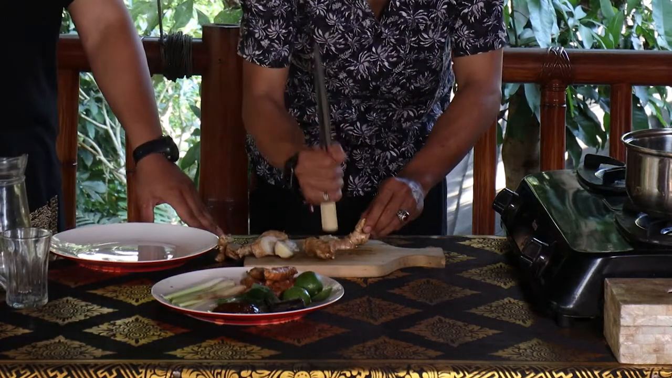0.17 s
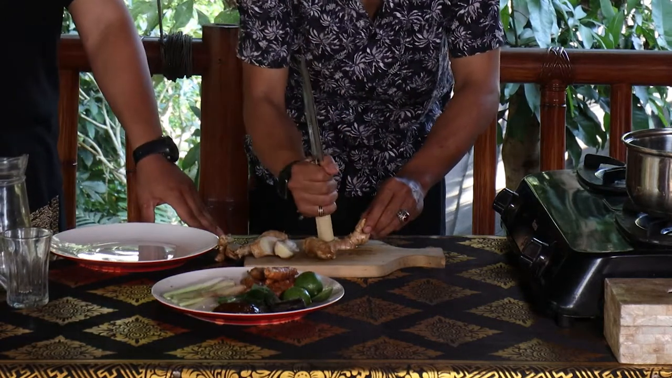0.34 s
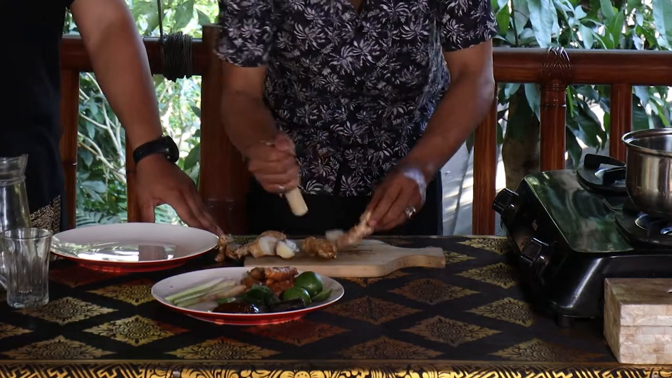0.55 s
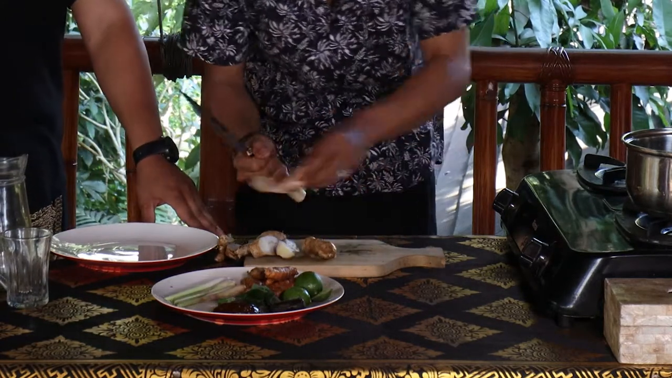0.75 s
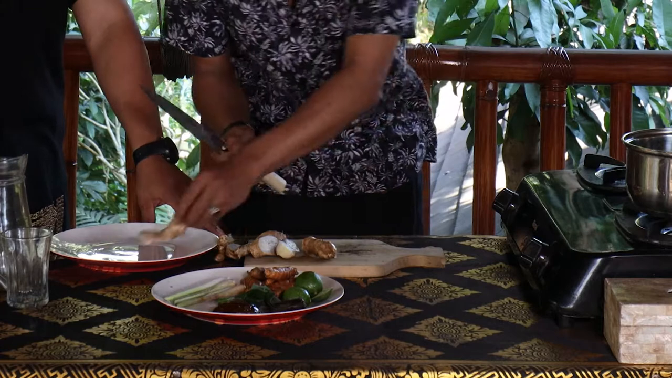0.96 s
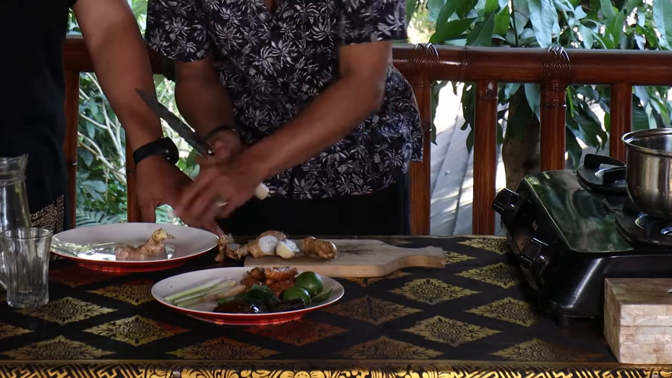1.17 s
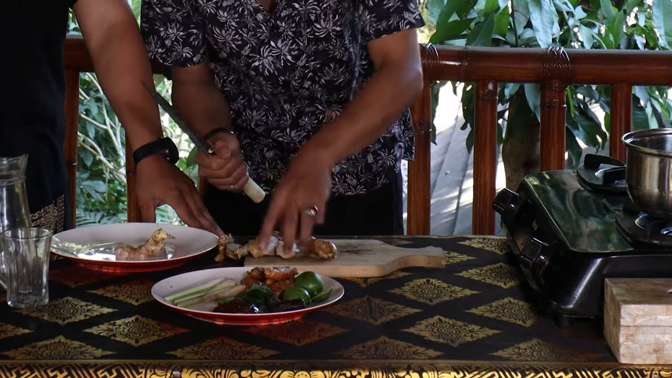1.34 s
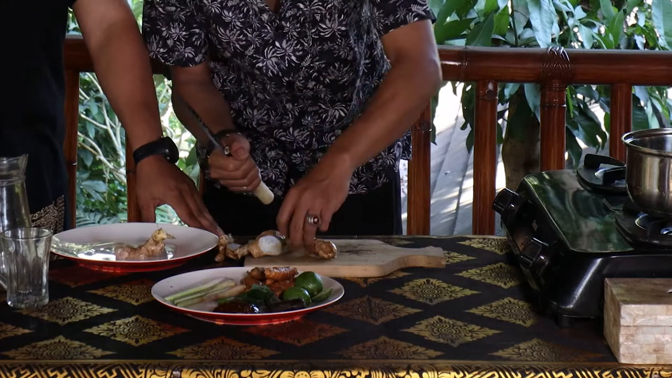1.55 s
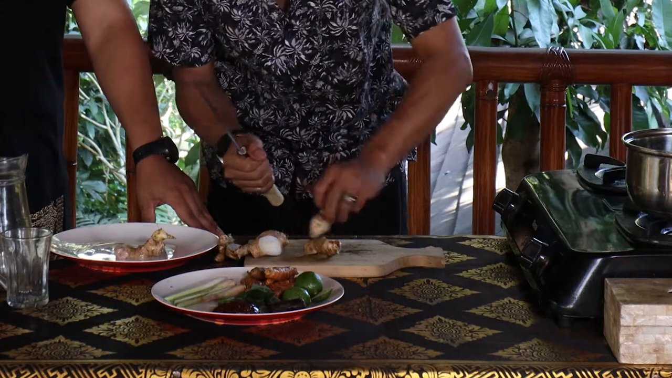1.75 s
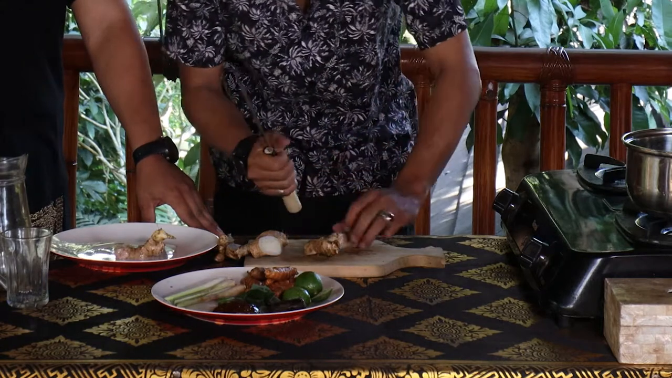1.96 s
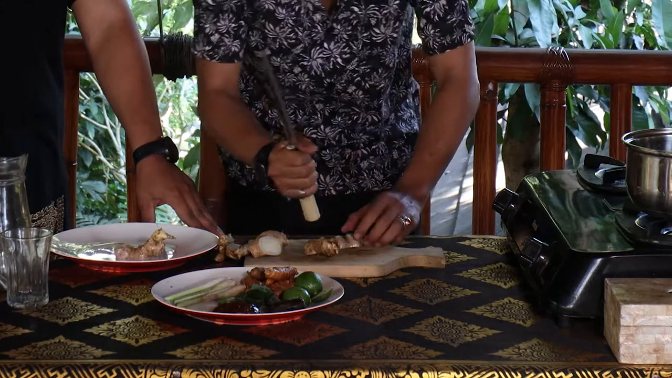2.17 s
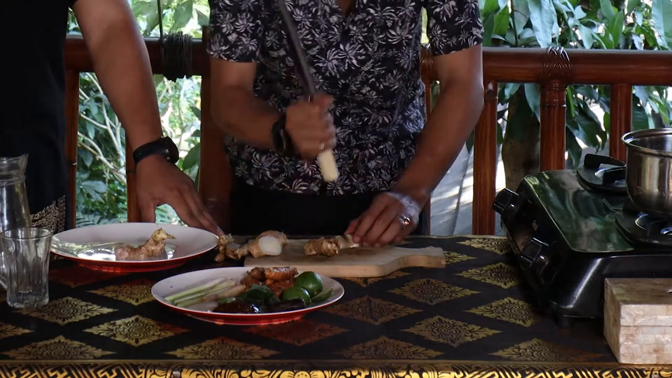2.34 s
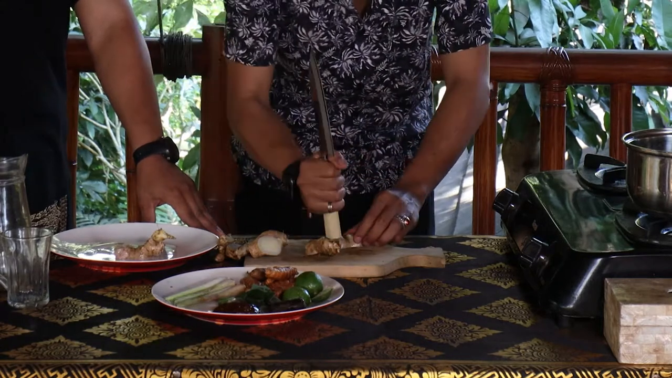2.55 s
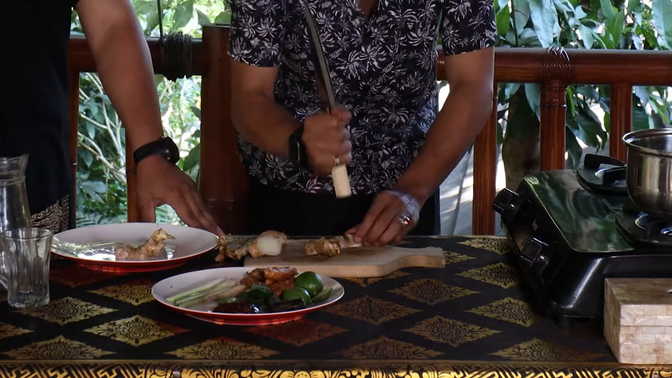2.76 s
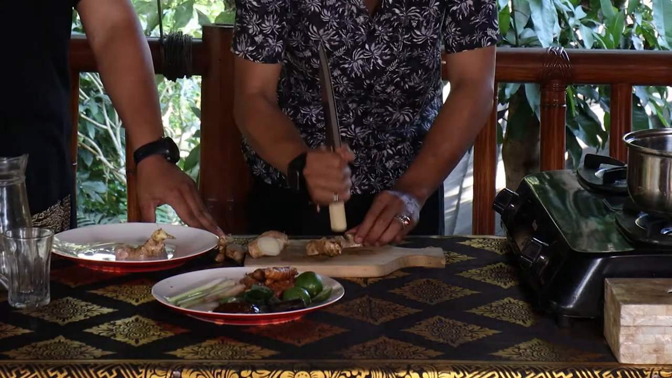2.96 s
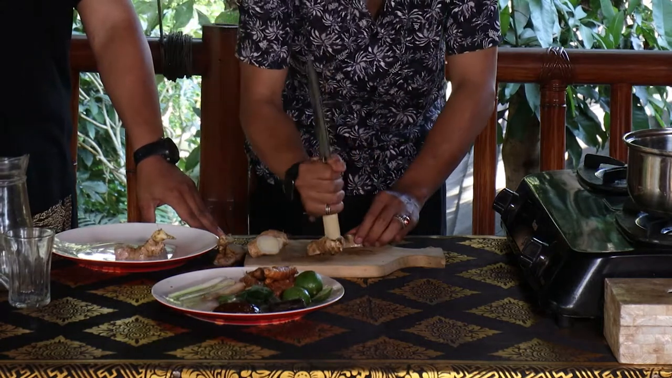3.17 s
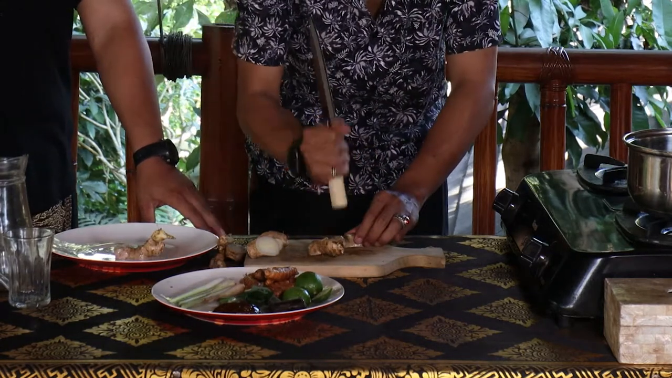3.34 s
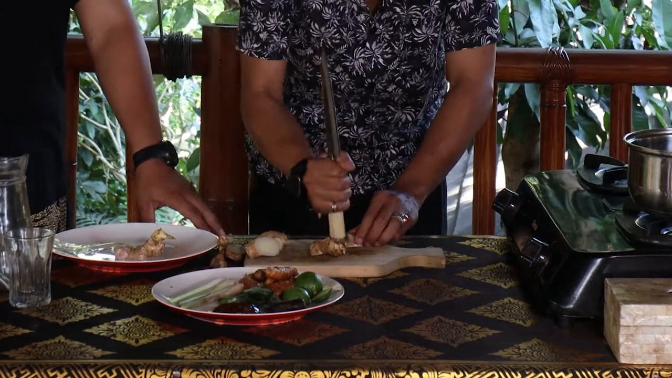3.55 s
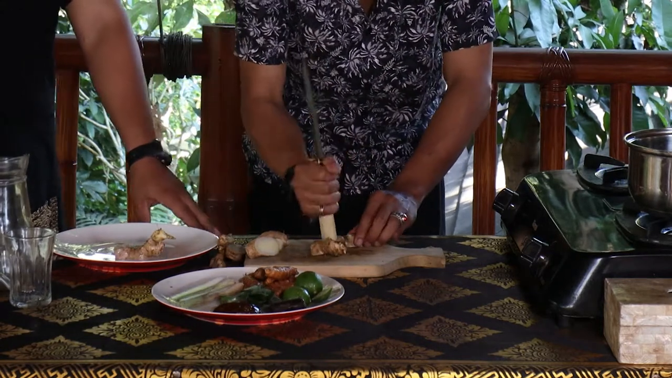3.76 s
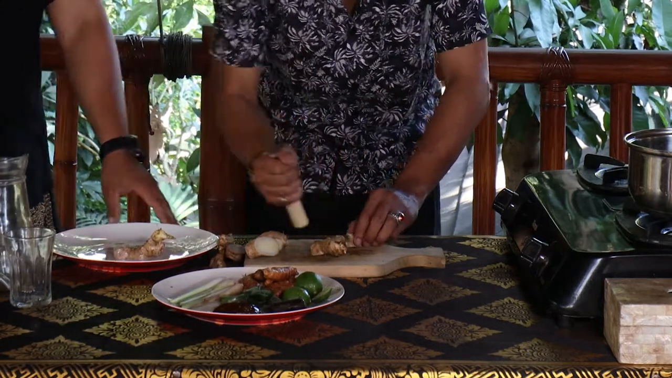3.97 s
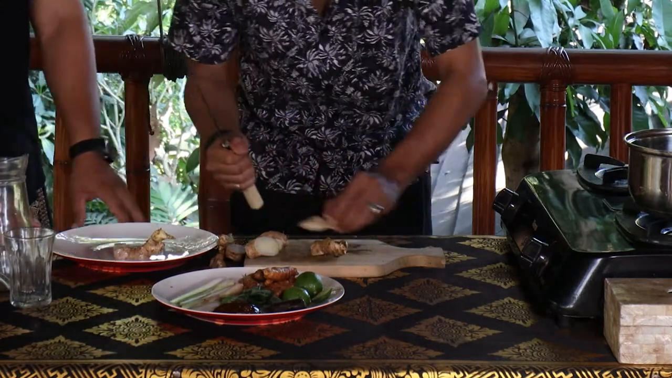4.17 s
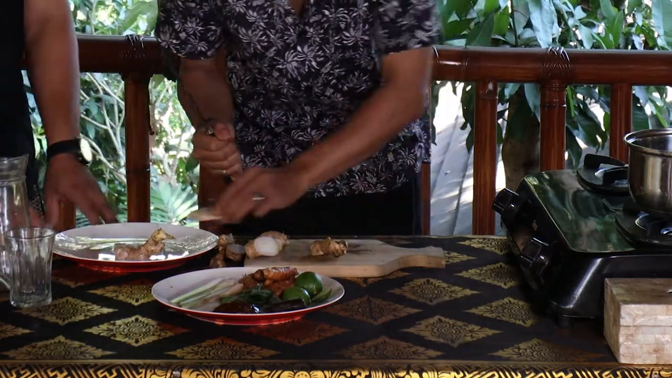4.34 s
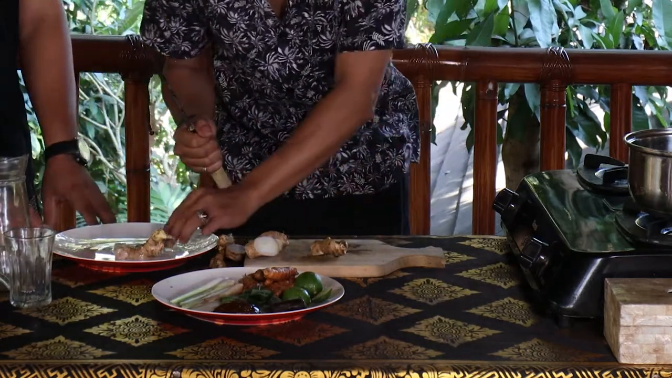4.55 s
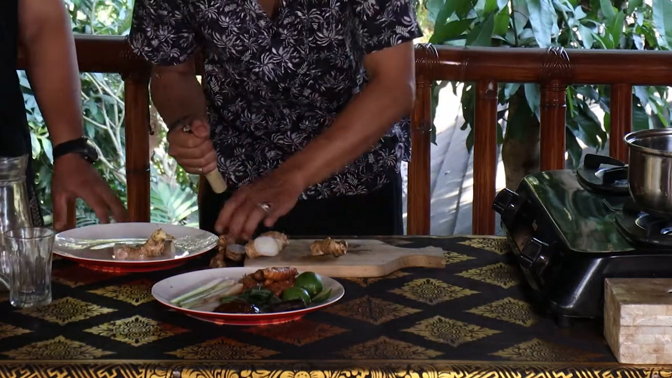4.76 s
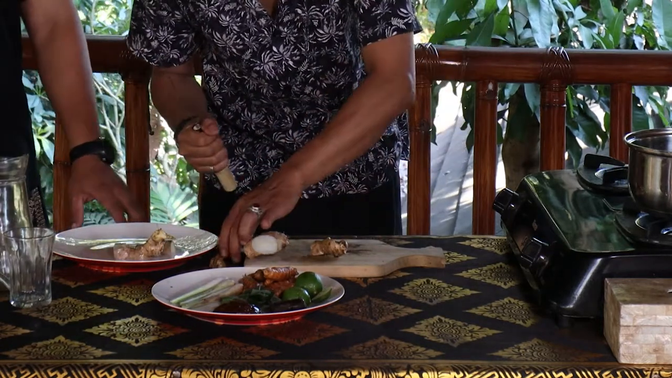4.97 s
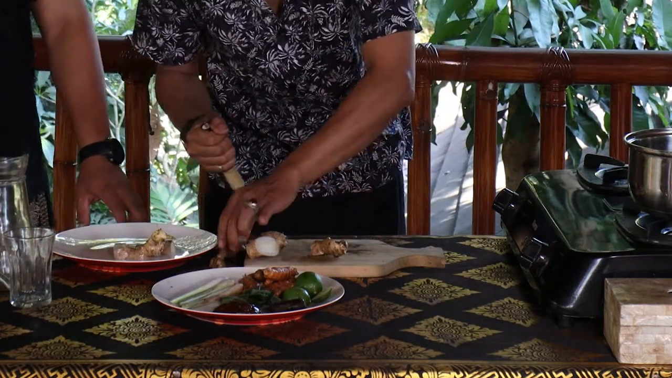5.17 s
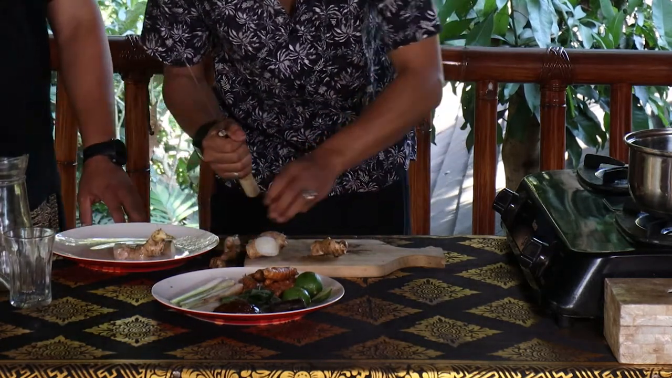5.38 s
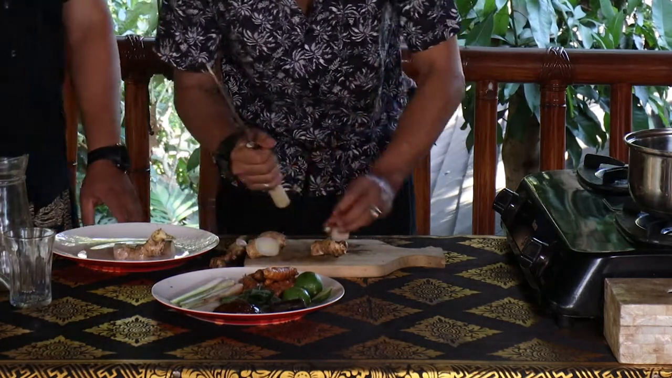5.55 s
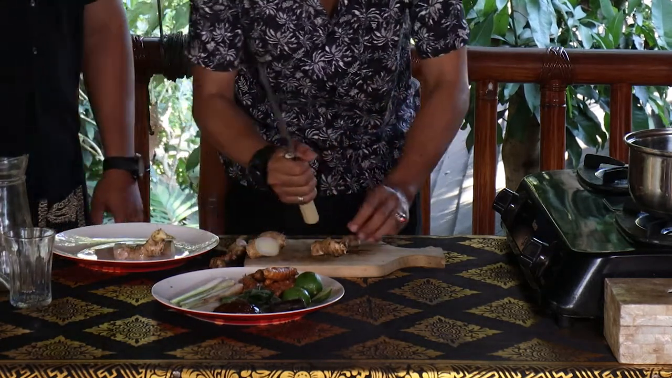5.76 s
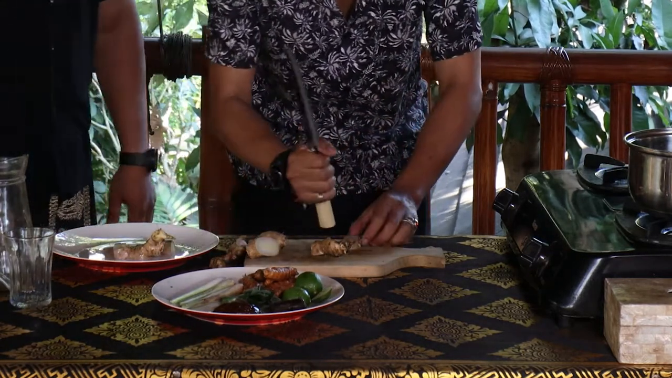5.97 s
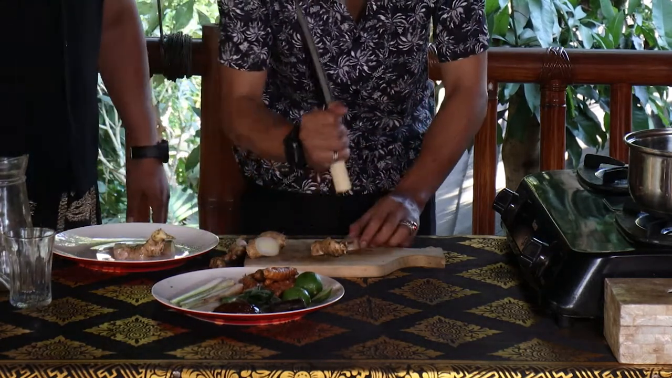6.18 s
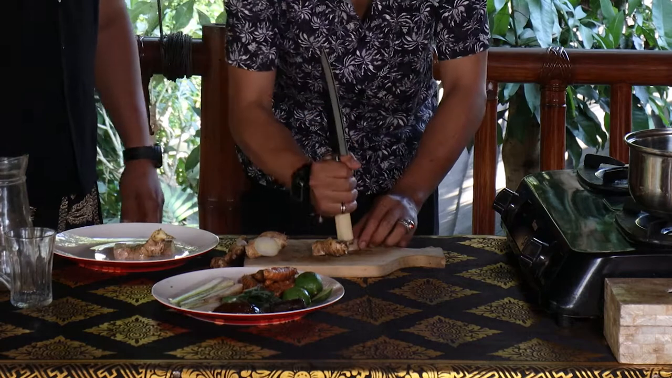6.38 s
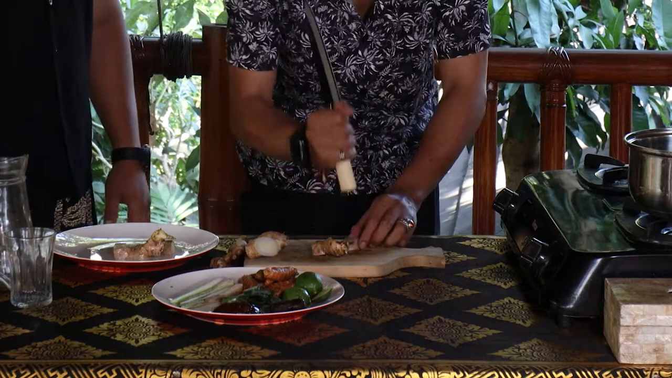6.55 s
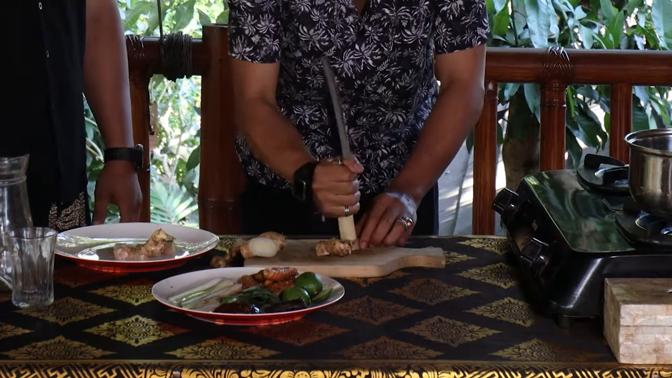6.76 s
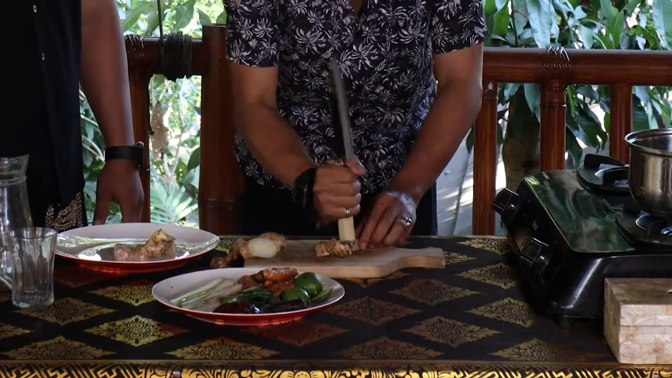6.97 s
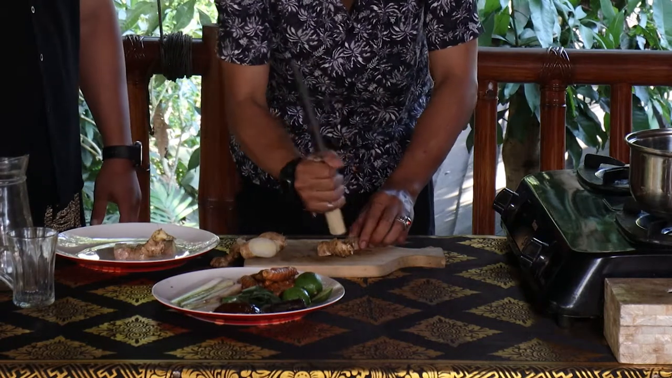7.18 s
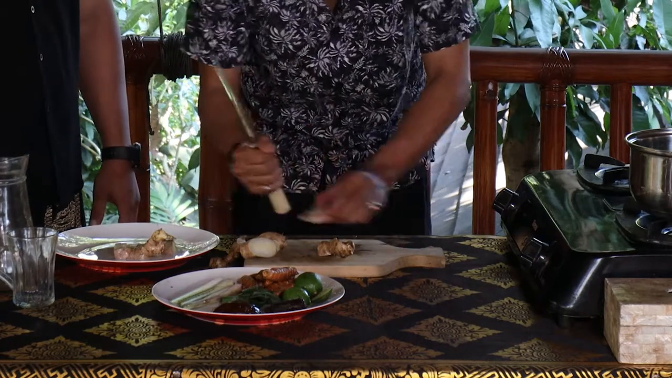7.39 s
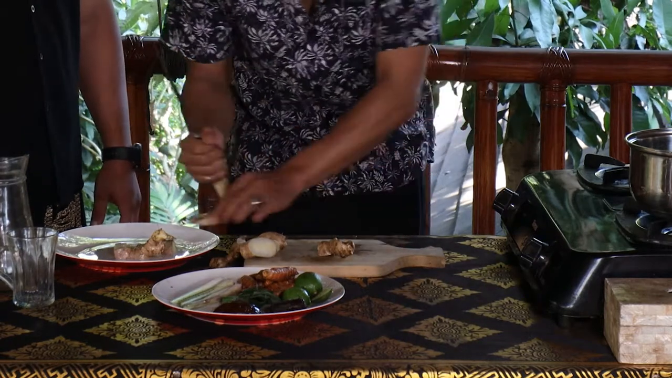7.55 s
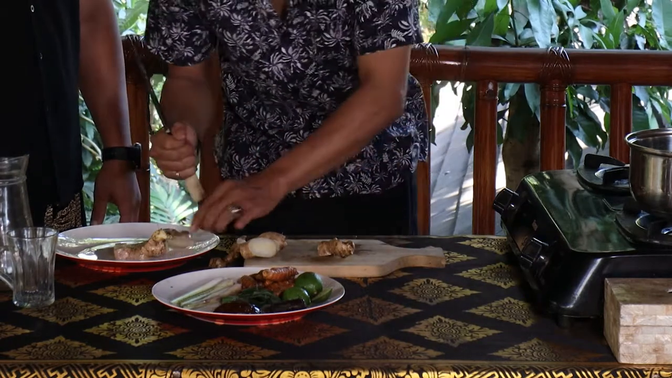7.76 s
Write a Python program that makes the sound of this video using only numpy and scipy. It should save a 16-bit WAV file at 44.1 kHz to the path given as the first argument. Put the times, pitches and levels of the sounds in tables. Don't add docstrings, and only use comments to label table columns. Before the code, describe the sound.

Ginger is smashed on a board with sharp woody whacks and clattering rebounds, between soft handling sounds, on a quiet garden veranda.

```python
import sys
import numpy as np
from scipy import signal
from scipy.io import wavfile

SR = 44100
rng = np.random.default_rng(int(sys.argv[2]) if len(sys.argv) > 2 else 0)


def ratio(d):
    e = np.asarray(d, float) / 20
    return 10 ** e


def materialize(psi):
    bounded = np.clip(np.atleast_2d(psi).T, -1, 1)
    quanta = np.round(bounded * 32767).astype(np.int16)
    wavfile.write(sys.argv[1], SR, quanta)


N = 344862
TIME = np.arange(N) / SR

# start in seconds, thump level in dB, crack level in dB, plate ring in dB, glass ring in dB.
BLOWS = [
    (.082, -5, -14, -47, -50),
    (0.3645, -4, -24, -52, -47.5),
    (2.555, -6.5, -18, -45.5, -40.5),
    (2.896, -5, -16.5, -43, -42),
    (3.213, -4, -19.5, -42.5, -44.5),
    (3.5178, -3.5, -18, -38.5, -51),
    (3.8018, -4.5, -32.5, -45.5, -56),
    (6.3666, -7, -26.5, -48.5, -55),
    (6.7228, -4.5, -21, -30.5, -42),
    (7.0453, -4, -23, -34.5, -44.5),
]
# far-edge knock in dB, slap delay in seconds, slap in dB,
# landing delay in seconds, landing in dB.
REBOUNDS = [(-5.5, .0201, -8, .0534, -6), (-6.5, .0187, -6.8, .051, -8), (-7.5, 0.019, -3.5, 0.051, -6),
            (-11, 0.017, -3.5, .0515, -6.5), (-11, 0.022, -4.5, 0.044, -4), (-6, 0.013, -4.5, 0.047, -3),
            (-3.5, 0.012, -9.5, .0577, -14.5), (-11.5, .0204, -5.5, .0499, -10.5),
            (-3, 0.023, -6, .0541, -1.5), (-5, .0165, -5.5, .056, -3.5)]
# pitch in Hz,
# upper board mode in dB and table mode in dB, both relative to the contact.
VOICES = [(649, -6, -22), (690, 0, -16), (576, -4, -6), (610, -9, -6.5)]
# delay in seconds, level in dB relative to the thump.
CHATTER = [(.030, -13), (.0415, -10)]
# seconds from the landing, level in dB relative to it.
LANDING_TOUCHES = [
    (-.0065, -12),
    (.006, -7),
    (.0135, -14),
]
KNOCK_S = 0.012
SCATTER_DB, SCATTER_S, PITCH_SCATTER = 1, 0.001404, 0.12

# pitch in Hz, level in dB, cycles until it has died.
THUMP = [(329.5, 3, 3.7), (246, -13, 7.6), (484, -13.5, 21), (116, -21, 5.9)]
# pitch in Hz, level in dB, time to fall 60 dB in seconds.
CRACK = [(1594, 4.5, 0.012), (2550, -5, 0.012), (3080, 6, 0.0075), (4490, -2, 0.0064), (5260, 2, 0.0041),
         (6960, 0, 0.0043), (8950, -16, 0.011)]
# pitch in Hz, level in dB, time to fall 60 dB in seconds.
PLATE = [(581, -3, .47), (1212, 0, .87), (2460, -18, .43)]
# pitch in Hz, level in dB, time to fall 60 dB in seconds.
GLASS = [(5196, 0, .55), (5706, -6.5, .5), (6853, -16, .6), (8398, -19, .5)]
BARE_CRACK_DB, DULLING_PER_DB = -16.5, 1.77

# frequency in Hz, level in dB per Hz.
CLATTER = [(18, -43.5), (30, -26), (81, -14), (200, -8), (337, -2), (460, -4), (1480, -17), (2700, -30.5),
           (5300, -37.5), (9890, -46), (11900, -47.5), (13500, -51), (15000, -80)]
# frequency in Hz, time to fall 60 dB in seconds.
CLATTER_T60 = [(40, 0.22), (150, 0.22), (500, 0.22), (1500, 0.2), (5000, 0.13), (12000, 0.055)]

# start in seconds, peak in dB, pitch in Hz, board in dB, table thud in dB.
SET_DOWNS = [(1.193, -40.5, 1447, -56, -35), (1.209, -40, 1060, -41, -43), (1.918, -44, 907, -39, -49),
             (2.073, -54, 945, -42, -52), (2.103, -34, 1040, -47, -37.5), (3.096, -35, 740, -27, -36),
             (3.136, -49, 700, -34, -37), (4.59, -50, 936, -61, -48), (4.665, -44, 2360, -44, -38.5),
             (4.691, -43.5, 815, -54, -43), (5.212, -63, 1070, -35, -35.5), (5.252, -50, 947, -60, -43.5),
             (5.553, -47, 1000, -59, -48), (5.636, -49, 790, -31.5, -32.5), (5.863, -33, 1375, -32, -40.5),
             (7.765, -49, 810, -52, -39.5)]
# start in seconds, peak in dB, pitch in Hz.
TOUCHES = [(0.853, -44, 1790), (1.016, -43.5, 914), (1.099, -41.5, 1400), (1.286, -45, 1330),
           (1.342, -45.5, 990), (1.437, -44, 910), (1.665, -38.5, 880), (1.689, -38.5, 1750),
           (2.296, -41, 847), (4.181, -45.5, 786), (4.627, -44.5, 780), (4.718, -47, 1000),
           (4.895, -42.5, 1580), (5.011, -42.5, 1540), (5.084, -39, 2630), (5.328, -39.5, 1930),
           (5.414, -38, 2520), (6.016, -40, 1680), (6.099, -45, 2190), (7.493, -44, 920)]
TOUCH_BOARD_DB, TOUCH_THUD_DB = -19.5, -24.5
# start in seconds, peak in dB, pitch in Hz.
TICKS = [(0.8131, -48, 6000), (1.2146, -44, 6120), (1.5614, -53, 9340), (1.6018, -42, 9500),
         (1.8647, -46, 9800), (2.0667, -43, 10950), (2.163, -41, 11300), (2.2426, -42, 10400),
         (2.4648, -43, 11700), (4.568, -41, 10000), (4.8943, -45, 6290), (5.3284, -53, 6400),
         (5.9324, -50, 6280), (6.2355, -37, 10700), (6.3365, -35.5, 7400), (6.6787, -34, 8900),
         (7.0124, -32, 8250), (7.3393, -36.5, 11200), (7.633, -41, 6430)]
# start in seconds,
# level in dB, pitch in Hz, time to fall 60 dB in seconds.
CLINKS = [(0, -59, 7000, .6), (2.22, -45, 810, .25), (2.393, -33, 3160, .02), (2.69, -49.5, 2460, .3),
          (2.81, -52, 3400, .1), (4.5, -52, 2500, .1), (4.666, -34.5, 3590, .067), (4.666, -41, 2390, .087),
          (4.666, -49, 5900, .06), (4.666, -42, 420, .091), (6.012, -54, 3150, .25),
          (6.376, -38, 8000, .03), (6.655, -48, 2900, .05), (6.679, -45, 3650, .03),
          (7.072, -36, 5000, .04), (7.235, -55, 2350, .13)]
# time in seconds, level in dB.
SLIDE = [(5.45, -90), (5.55, -62), (5.75, -54.5), (5.95, -61), (6.1, -61), (6.2, -87)]

# frequency in Hz, level in dB per Hz.
WATER = [(15, -43), (25, -7.5), (145, -3), (363, -6.5), (439, -1.5), (545, -0.5), (1330, -1.5),
         (1840, -1.5), (2910, -8), (3250, -9.5), (3820, -13.5), (5430, -18), (11300, -17), (12900, 3),
         (16000, -40)]
# frequency in Hz, likeness from 0 to 1.
LIKENESS = [(60, 0.83), (180, 0.66), (550, 0.78), (1650, 0.95), (4970, 0.72), (15000, 0.26)]
WATER_DB, WATER_SWAY_DB = -52, 0.54
CRICKET_DB, CRICKET_BEAD_DB, CRICKET_BEADS_PER_S = -65, 9, 9.0
CICADA_PERIOD_S, CICADA_TOP_S, CICADA_ONSET, CICADA_STEEPNESS = 2.28, .44, .45, 3.5
CICADA_LOW_HZ, CICADA_RISE_HZ, CICADA_LOW_DB, CICADA_SWELL_DB = 13150, 600, -75.5, 5.5


def rms_one(x):
    return x / np.sqrt(np.mean(x ** 2) + 1e-20)


def at_hz(points, hz):
    table_hz, values = np.transpose(points)
    return np.interp(np.log(hz), np.log(table_hz), values)


def drift(rate):
    r = np.exp(-40 * np.pi * rate / SR)
    slow = signal.lfilter([1], [1, -2 * r, r * r], rng.standard_normal(N // 20 + 4002))[4000:]
    return np.interp(np.arange(N) / 20, np.arange(len(slow)), rms_one(slow))


def ring(pushes, hz, t60):
    r, w = ratio(-60 / (t60 * SR)), 2 * np.pi * hz / SR
    return signal.lfilter([0, np.sin(w)], [1, -2 * r * np.cos(w), r * r], pushes + 1e-18)


def clicks(times, level_db):
    out = np.zeros(N)
    out[np.round(np.asarray(times) * SR).astype(int)] = ratio(level_db)
    return out


def add(out, s, level_db, hz, cycles, rise):
    i = round(s * SR)
    turns = np.arange(min(N - i, 9000)) * hz / SR
    envelope = ratio(level_db - 60 * turns / cycles) * (1 - np.exp(-turns / rise))
    out[i:i + len(turns)] -= envelope * np.sin(2 * np.pi * turns)


def bands():
    edges = 22 * 2 ** np.arange(0, 9.7, 1 / 2.5)
    white = rng.standard_normal((2, 2, N))
    for k, (low, high) in enumerate(zip(edges, edges[1:])):
        sos = signal.butter(2, [low, high], "band", fs=SR, output="sos")
        yield np.sqrt(low * high), signal.sosfilt(sos, white[k % 2])


def blows():
    s, thump_db, crack_db, plate_db, glass_db = np.transpose(BLOWS)
    tilt_db = DULLING_PER_DB * (crack_db - BARE_CRACK_DB)
    # modes, level in dB, treble tilt in dB per octave, delay in s, scatter in dB
    parts = ((CRACK, crack_db + 4.5, tilt_db, 0, 2.5),
             (PLATE, plate_db, 0, .03, 1.2),
             (GLASS, glass_db, 0, .03, 1.5))
    out = np.zeros(N)
    for modes, level_db, slope_db, late, scatter_db in parts:
        for hz, mode_db, t60 in modes:
            treble_db = slope_db * max(np.log2(hz / 3000), 0)
            strength_db = level_db + mode_db + treble_db + rng.normal(0, scatter_db, len(s))
            out -= ring(clicks(s + late, strength_db), hz, t60)
    out = signal.lfilter([.52], [1, -.5], out)
    out = signal.lfilter(*signal.butter(2, 10500, fs=SR), out)
    for at, level_db in zip(s, thump_db):
        for hz, mode_db, cycles in THUMP:
            add(out, at, level_db + mode_db + 12.5, hz * rng.uniform(0.908, 1.059), cycles, rise=1.0)
    return out


def contacts():
    rows = []
    for (s, thump_db, *_), (knock_db, slap_s, slap_db, land_s, land_db) in zip(BLOWS, REBOUNDS):
        rows += [(s + KNOCK_S, knock_db, 0), (s + slap_s, slap_db, 1), (s + land_s, land_db, 2)]
        for late, db in LANDING_TOUCHES:
            rows.append((s + land_s + late, land_db + db + SCATTER_DB * rng.normal(), 3))
        for late, db in CHATTER:
            at = s + late + SCATTER_S * rng.normal()
            rows.append((at, thump_db + db + SCATTER_DB * rng.normal(), 3))
    return rows


def rebounds(hits):
    out = np.zeros(N)
    for s, peak_db, voice in hits:
        hz, upper_db, table_db = VOICES[voice]
        add(out, s, peak_db + 6.5, hz * np.exp(PITCH_SCATTER * rng.normal()), cycles=7.1, rise=0.47)
        add(out, s, peak_db + upper_db + 4.0, 990 * rng.uniform(0.803, 1.16), cycles=18.1, rise=1.0)
        add(out, s, peak_db + table_db + 1, 300 * rng.uniform(0.86, 1.23), cycles=5.7, rise=0.28)
    return out


def clatter(rebound_hits, noise_bands):
    hits = np.array([row[:2] for row in BLOWS + rebound_hits])
    power = clicks(hits[:, 0], 2 * hits[:, 1])
    lumps = ratio(np.array([2.6 * drift(49), 3.0 * drift(55), 4.9 * drift(153)]))
    out = 0
    for k, (hz, (noise, _)) in enumerate(noise_bands):
        r = ratio(-120 / (at_hz(CLATTER_T60, hz) * SR))
        build_s = at_hz([(1500, 0.00043), (5000, 0.012)], hz)
        build = np.exp(-1 / (SR * build_s))
        dying = signal.lfilter([1], [1, -r], power + 1e-18)
        energy = signal.lfilter([1 - build], [1, -build], dying)
        out = out + ratio(at_hz(CLATTER, hz)) * lumps[k // 9] * np.sqrt(energy) * noise
    return ratio(5.5) * out


def handling():
    out = np.zeros(N)
    light = [(s, db, hz, db + TOUCH_BOARD_DB, db + TOUCH_THUD_DB) for s, db, hz in TOUCHES]
    for s, peak_db, hz, board_db, thud_db in SET_DOWNS + light:
        add(out, s, board_db + 4.5, 530, cycles=14.0, rise=1.0)
        add(out, s, peak_db + 8.5, hz, cycles=19.4, rise=0.5)
        add(out, s + 0.00422, peak_db - 0.5, hz * 1.113, cycles=40.0, rise=0.92)
        add(out, s, thud_db + 3.5, 290, cycles=9.7, rise=0.42)
    for s, peak_db, hz in TICKS:
        add(out, s, peak_db + 5.0, hz, cycles=49.0, rise=3.5)
        add(out, s, peak_db + 3.0, hz * .78, cycles=32.0, rise=3.0)
        add(out, s, peak_db, hz * 1.25, cycles=27.0, rise=1.5)
    for s, level_db, hz, t60 in CLINKS:
        add(out, s, level_db, hz, t60 * hz, rise=0.68)
    return out


def slide():
    s, level_db = np.transpose(SLIDE)
    strength = ratio(np.interp(TIME, s, level_db) + 2.5 * drift(25))
    return strength * rms_one(ring(rng.standard_normal(N), 1510, 0.017))


def grains(per_s, low_hz, high_hz, cycles, spread_db):
    sizes = ratio(spread_db * np.minimum(rng.exponential(1, N), 4)) * (rng.random(N) < per_s / SR)
    dealt = rng.integers(0, 14, N)
    pitches = np.geomspace(low_hz, high_hz, 14)
    return rms_one(sum(ring(sizes * (dealt == k), hz, cycles / hz) for k, hz in enumerate(pitches)))


def water(noise_bands):
    rush, together = 0, drift(4.3)
    for hz, (mid, side) in noise_bands:
        alike = np.clip(at_hz(LIKENESS, hz), 0, 1)
        gain = ratio(at_hz(WATER, hz) + .5 * together + 3.3 * drift(36.6))
        rush = rush + gain * (np.sqrt(1 + alike) * mid + np.sqrt(1 - alike) * side * [[1], [-1]])
    bubbles = grains(per_s=120.0, low_hz=519, high_hz=2890, cycles=32.0, spread_db=4.0)
    bubbles = signal.lfilter([.3], [1, -.7], bubbles)
    splashes = grains(per_s=120.0, low_hz=4500, high_hz=13000, cycles=9.0, spread_db=3.5)
    mix = rms_one(rush) + ratio(-8.5) * rms_one(bubbles) + ratio(-16.0) * splashes
    return ratio(WATER_DB + WATER_SWAY_DB * drift(0.62)) * mix


def cricket():
    hz = 12595 + 45 * np.cos(2 * np.pi * (TIME - .85) / 1.43) + 8 * drift(30)
    phase = 2 * np.pi * np.cumsum(hz) / SR
    partner = ratio(-12 + 4 * drift(8)) * np.sin(phase * .9725)
    beads_db = CRICKET_BEAD_DB * drift(CRICKET_BEADS_PER_S) ** 2
    out = ratio(CRICKET_DB + 4.5 - beads_db) * (np.sin(phase) + partner)
    flicker = (1 + .35 * drift(25)) * ratio(1.5 * drift(4))
    return out + flicker * (ratio(-63) * np.sin(phase / 4) + ratio(-74.0) * np.sin(phase / 2))


def cicada():
    cycle = np.cos(2 * np.pi * (TIME - CICADA_TOP_S) / CICADA_PERIOD_S)
    swell = np.clip(CICADA_STEEPNESS * (cycle - CICADA_ONSET), 0, 1)
    hz = CICADA_LOW_HZ + CICADA_RISE_HZ * swell
    level_db = CICADA_LOW_DB + CICADA_SWELL_DB * swell
    phase = 2 * np.pi * np.cumsum(hz) / SR
    out = 0
    for share, part_db, width_hz in ((0.97, 0, 310), (.51, -5.5, 63), (.252, 7, 130)):
        buzz = drift(width_hz) * np.sin(share * phase) + drift(width_hz) * np.cos(share * phase)
        out = out + ratio(level_db + part_db) * buzz
    return out


def scene():
    hits, noise = contacts(), list(bands())
    table = blows() + rebounds(hits) + clatter(hits, noise) + handling() + slide()
    garden = water(noise) + cricket() + cicada()
    return table + garden * ratio(np.array([[-.6], [.6]]))


def band_limit(x):
    return signal.sosfilt(signal.butter(12, 16810, fs=SR, output="sos"), x)


def record(dry):
    x = signal.sosfilt(signal.butter(2, 64, "high", fs=SR, output="sos"), dry)
    x = 1.02 * np.tanh(x / 1.02)
    x = signal.sosfilt(signal.cheby2(16, 60, 16800, fs=SR, output="sos"), x)
    return band_limit(x)


dry = scene()
out = record(dry)
materialize(out)
```